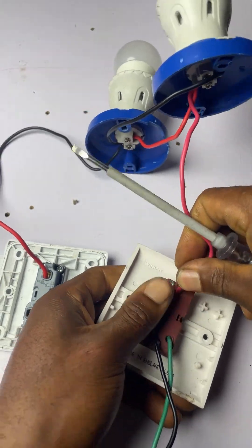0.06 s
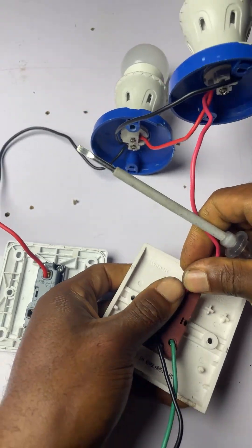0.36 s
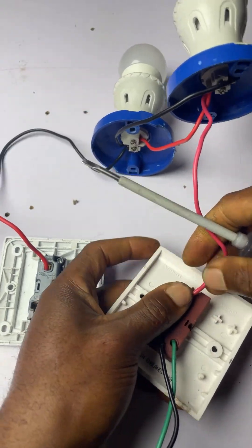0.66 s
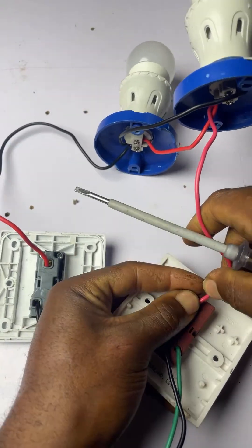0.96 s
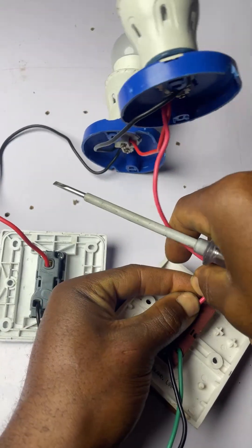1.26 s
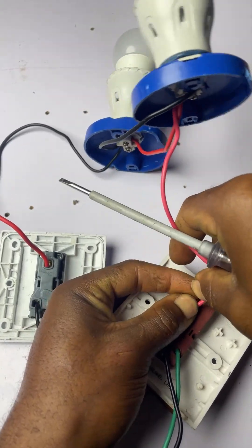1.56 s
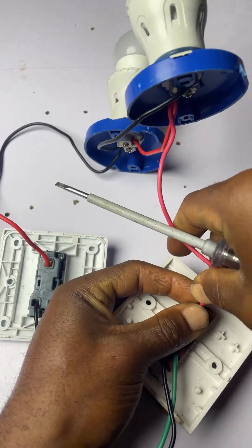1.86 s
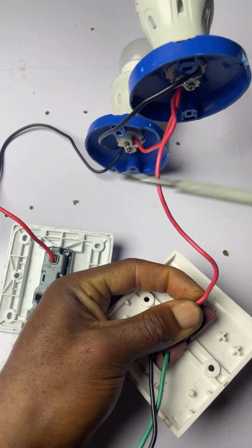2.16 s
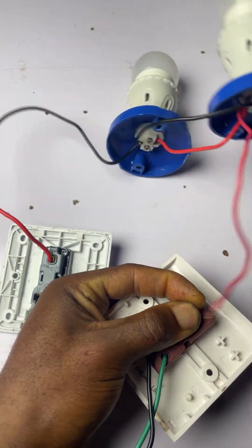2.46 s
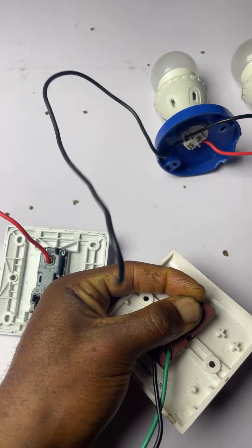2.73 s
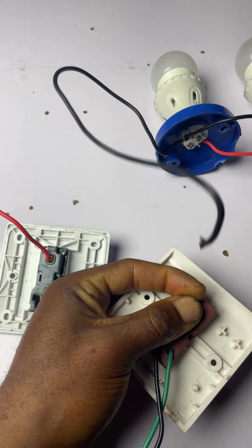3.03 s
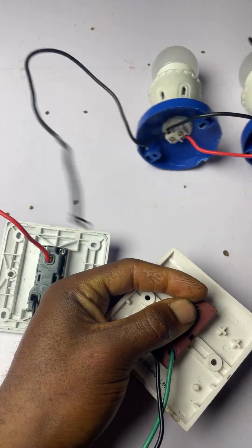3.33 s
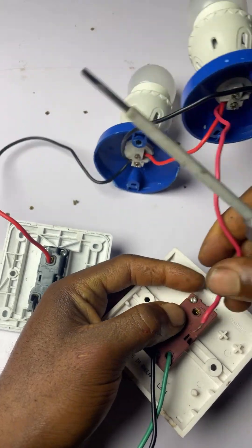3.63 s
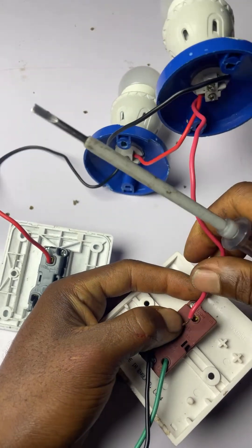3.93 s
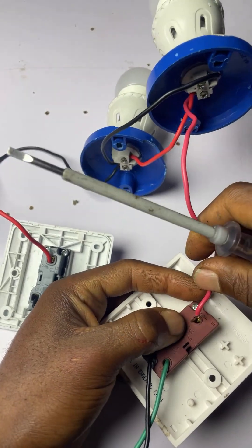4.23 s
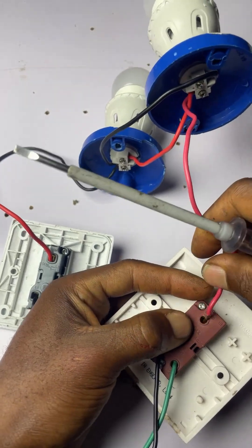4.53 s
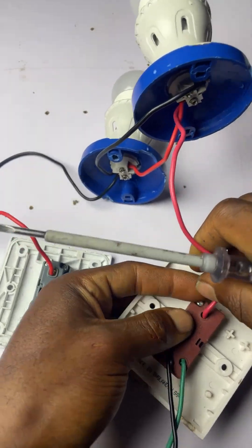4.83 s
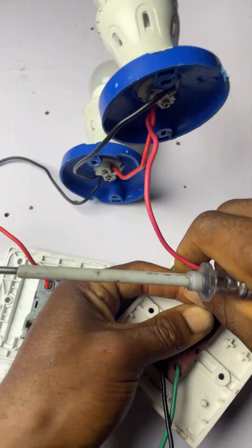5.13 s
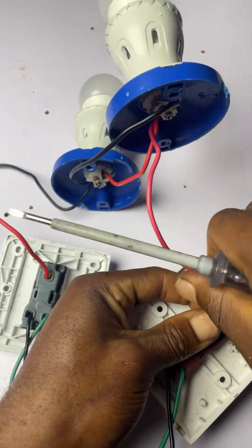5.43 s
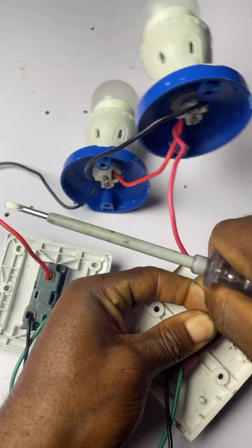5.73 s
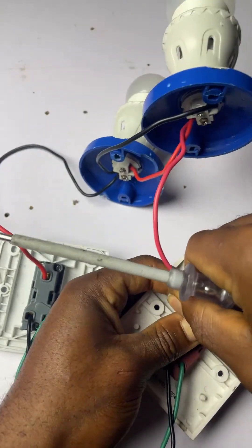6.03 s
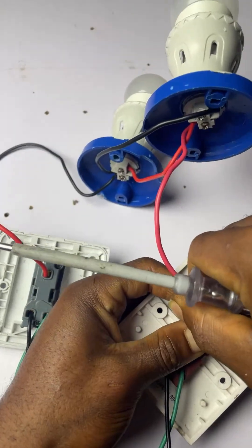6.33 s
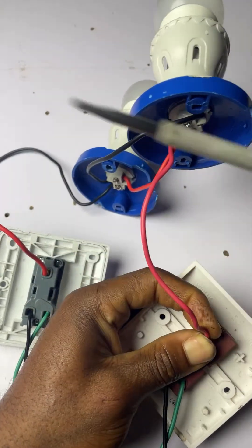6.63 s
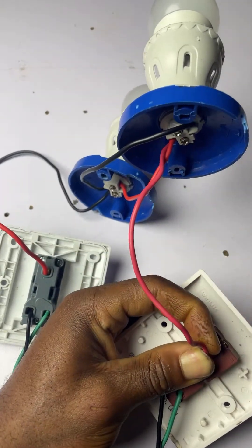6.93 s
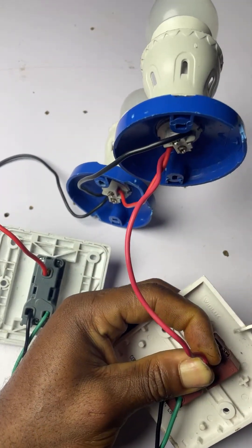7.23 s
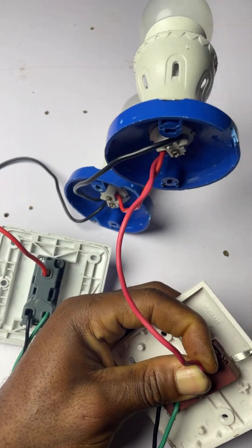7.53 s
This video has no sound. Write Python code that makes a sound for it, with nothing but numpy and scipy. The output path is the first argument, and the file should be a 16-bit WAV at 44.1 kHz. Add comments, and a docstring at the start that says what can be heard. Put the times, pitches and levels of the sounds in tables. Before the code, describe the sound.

Hands feed a wire into a plastic wall switch, making soft ticks, clacks and brief rubs. Tugged plastic lamp holders knock on a hollow board, and one topples with a loud clatter and a short ring. Scattered lighter knocks and ticks follow, then a firm double knock. Near the end a screwdriver tip clicks sharply on a metal screw several times. The sounds are close, in a small, quiet, bare room.

```python
"""A soft knock, a plastic clack and a rub come first: a wire is being fed into a wall switch on a hollow
work board in a small bare room. Tugged by their wires, two lamp holders knock on the board and excite its
bending modes; one topples and rings. Plastic shells clack, the wire ticks as it catches, and fingers rub.
At last a screwdriver tip clicks onto the terminal screw. Each impact is a brief contact followed by
damped modes and reverberation; the harder the contact, the brighter the sound."""
import sys
import numpy as np
from scipy import signal
from scipy.fft import rfft, irfft, next_fast_len
from scipy.io import wavfile
from scipy.ndimage import uniform_filter1d, map_coordinates

SR = 44100
rng = np.random.default_rng(int(sys.argv[2]) if len(sys.argv) > 2 else 0)


def wav_out(sig):
    """Save sig, one row per channel (or a flat mono array), as 16-bit PCM at SR to the path in sys.argv[1]."""
    wavfile.write(sys.argv[1], SR, np.round(np.clip(np.atleast_2d(sig).T, -1, 1) * 32767).astype(np.int16))


N = 343098
SIZE = 24576  # samples in one impact response
T, HZ = np.arange(SIZE) / SR, np.fft.rfftfreq(SIZE, 1 / SR)

# impacts of holder on board and of shell on shell: (time [s], level [dB], hardness [dB])
HOLDER_KNOCKS = [(.003, -41, 3.5), (.203, -43, -19), (0.646, -47.5, -20), (.694, -45.5, -8),
                 (1.997, -48.5, 5), (2.371, -44.5, 1), (2.484, -25.5, -4.5), (2.511, -31, 3),
                 (2.53, -28.5, 1), (2.568, -17, 11.5), (2.692, -27.5, 3.5), (3.285, -47, 4),
                 (3.346, -44, 4), (3.4419, -31, 6), (3.574, -38.5, 4), (3.66, -44, -15), (3.918, -44, -2),
                 (4.137, -39, -0.5), (4.298, -46, -12), (4.365, -44, -8), (4.408, -43.5, -8.5),
                 (4.521, -37, -3.5), (4.641, -35.5, -0.5), (4.767, -35, 5), (4.825, -41, 3),
                 (4.906, -34, -26), (5.256, -30, 4.5), (5.735, -24.5, -0.5), (5.761, -24, 0),
                 (5.784, -35.5, 10.5), (6.326, -52, 2), (6.477, -52.5, 6.5)]
SHELL_CLACKS = [(0.0228, -38, 1), (0.411, -49.5, -2.5), (1.1159, -51, -3.5), (2.446, -45, 3.5),
                (2.568, -18.5, -9.5), (2.654, -33.5, -11.5), (4.905, -60, 8), (5.951, -40, 4)]
# wire and nails on the switch, tip on the screw: (time [s], level [dB], hardness [dB], ring [Hz])
WIRE_TICKS = [(.0235, -37, 0, 2700), (.3895, -44.5, -4, 2740), (.6745, -56, -8, 2480),
              (.7, -54.5, 10, 2500), (1.1165, -43.5, -2, 2900), (1.5225, -66, 19.5, 5170),
              (1.648, -60, 2, 2580), (1.995, -48, -8.5, 2436), (2.109, -63.5, 3, 2150),
              (2.154, -58, -2.5, 3500), (2.182, -55, 2, 2280), (2.221, -63, 11.5, 1800),
              (2.35, -61, 3, 2480), (2.4355, -40, 3, 2400), (2.439, -33.5, 10, 3840),
              (3.223, -59.5, -6, 2590), (3.347, -62, 17, 2520), (3.5795, -27, -4.5, 2480),
              (3.6215, -47, -6, 2550), (3.6605, -52.5, -18, 2420), (3.9535, -56, -11, 2620),
              (3.978, -54.5, -10, 2680), (4.117, -61.5, 10, 4740), (4.407, -44, 0.5, 2550),
              (4.8245, -39.5, 6.5, 2590), (4.849, -44.5, 3, 2820), (4.906, -40, 2, 3050),
              (4.93, -46, 14, 2550), (4.95, -42, -15, 3630), (5.2055, -46.5, -11, 2480),
              (5.2372, -40, 8, 2900), (5.596, -64.5, -14, 2500), (6.3256, -51, -12, 2780),
              (6.4788, -51.5, -5, 2515), (6.422, -66.5, -14, 1890), (6.715, -70, -2, 2650),
              (6.881, -67, -17, 1900), (7.09, -71, -13, 1840)]
TIP_CLICKS = [(7.2262, -34.5, 19.5, 3710), (7.5053, -28.5, 19.5, 3284), (7.5165, -37.5, -1, 3284),
              (7.6206, -32, 5.5, 3200), (7.627, -35.5, -10.5, 3200), (7.69, -43, -5.5, 3100),
              (7.708, -45.5, -10, 3100)]
# finger strokes: (start [s], length [s], rumble level [dB], rub level [dB])
FINGER_STROKES = [(0, 0.06, -38.5, -46), (0.188, 0.1, -59, -73), (0.374, .15, -56.5, -63),
                  (0.591, 0.14, -57.5, -60), (0.796, 0.11, -60.5, -79), (1.07, .06, -76, -67.5),
                  (1.555, .11, -76, -69), (2.149, .13, -60, -77), (2.39, .15, -50.5, -61),
                  (3.25, 0.12, -54.5, -76), (3.485, 0.19, -48, -62.5), (4.822, .16, -42.5, -53),
                  (5.186, 0.054, -76, -63), (5.357, 0.066, -54, -80.5), (5.794, 0.24, -50.5, -59.5),
                  (6.373, .15, -58, -75)]
# rumble of the holding hand: (time [s], level [dB])
HOLD_LEVELS = [(0, -52.5), (1.05, -83), (1.7, -83), (2.099, -68), (5.5, -64), (6.7, -66.5), (7.78, -68.5)]

# low, middle and high band of large and of small impacts: (lower edge [Hz], upper edge [Hz])
LARGE_BANDS = [(80, 500), (800, 2200), (3500, 12000)]
SMALL_BANDS = [(600, 1600), (2000, 4500), (6000, 14000)]
# contact laws, a row per band: (offset from the impact's level [dB], slope with hardness [dB/dB])
KNOCK_LAW = [(0.5, 0), (-13, 1), (-44.5, 1.56)]
CLACK_LAW = [(-9, 0.96), (2.5, 0), (-9, 1)]
TICK_LAW = [(-6, 0.013), (-1.5, 0), (-20.5, 0.91)]
TIP_LAW = [(-3.5, -0.082), (-0.5, 0.049), (-19.5, 1)]

# normal modes of each body: (frequency [Hz], relative level [dB], t60 [s])
BOARD_MODES = [(124, -7, .2), (193, -2, .14), (228, -5, .12), (263, -5, .14), (329, 1, .21), (378, -5, .15),
               (466, 1, .11), (624, -2, .1), (700, -8, .09), (940, -7, .14), (1095, -10, .11),
               (1141, -7, .18), (1214, -9, .14), (1266, -8, .16), (1395, -8, .14), (1474, -11, .13),
               (1534, -13, .15), (1790, -13, .1), (1920, -11, .07), (2066, -12, .07), (2535, -22, .09),
               (3500, -31, .07), (6900, -33, .06), (8950, -23, .07), (9130, -24, .07)]
LAMP_MODES = [(478, -2.5, .2), (616, 2, 0.16), (937, -10, .43), (1141, -8, 0.44), (1265, -9, .49),
              (1330, -13.5, 0.71), (1390, -14, .6), (1450, -12.5, .63), (1500, -12, .7), (1710, -10.5, .68),
              (1770, -11.5, .65)]
SHELL_MODES = [(174, -9.5, 0.11), (337.2, -5.5, .16), (623.7, 1.5, .12), (941, -5.5, 0.16),
               (1384, -0.5, 0.1), (1520, -11, 0.032), (1885, -2.5, 0.11), (2650, -1.5, 0.071)]
DRIVER_MODES = [(940, -3, .013), (1110, -6, .016), (1873, -11, .016), (3200, -5, .012), (3750, 0, .018),
                (4500, -5, .01), (5600, 0, .014), (5920, -25, .16), (6950, -5, .009), (6850, -31, .25),
                (9300, -33, .18), (11000, -8, .007)]
SWITCH_MODES = [(970, -7.5, 0.016), (1890, -1.5, 0.025), (2480, -4, 0.035), (2900, -7.5, 0.028),
                (5450, -9, 0.014), (9000, -16, 0.014)]
# spectra of each body's dense, unresolved ringing: (frequency [Hz], relative level [dB])
BOARD_SPECTRUM = [(25, -45), (55, -25), (90, -6.5), (200, 7.5), (480, -0.5), (740, -5), (1050, -1.5),
                  (1400, -4.5), (2200, -12.5), (3300, -20.5), (5000, -33), (9300, -30.5), (12500, -40),
                  (16000, -53)]
SHELL_SPECTRUM = [(30, -39), (90, -2.5), (400, -3), (650, 1.5), (900, -2.5), (1800, 1), (2500, -0.5),
                  (3200, -4.5), (5300, -7.5), (8000, -15), (11000, -23.5), (16000, -36.5)]
DRIVER_SPECTRUM = [(60, -38), (500, -32.5), (850, 0), (1500, -3), (2600, -4.5), (3500, 5), (5700, 0.5),
                   (8000, -2.5), (11300, -4.5), (12500, -15), (16000, -21)]
SWITCH_SPECTRUM = [(60, -36.5), (400, -15), (900, -7), (2600, -2.5), (4500, -0.5), (8000, -5.5),
                   (11000, -12.5), (16000, -28.5)]
# noise of loose metal, shifting switch, skin and still room: (frequency [Hz], relative level [dB])
RATTLE_SPECTRUM = [(2500, -40), (5000, -15.5), (6900, -4.5), (7900, -10.5), (9200, 0.5), (10500, -13.5),
                   (13000, -24.5), (16000, -30)]
RUMBLE_SPECTRUM = [(30, -36.5), (60, -8), (90, -0.5), (135, 2), (220, -4), (340, -1.5), (500, -15),
                   (1100, -18.5), (2000, -38), (4000, -60.5)]
RUB_SPECTRUM = [(300, -25), (1000, -5), (2000, 6), (2700, 7.5), (4000, -8), (6500, -10.5), (9300, -17),
                (12000, -25), (16000, -31.5)]
AMBIENT_SPECTRUM = [(15, -58.5), (25, -28), (130, 2.5), (170, -6.5), (277, -10.5), (344, -21), (489, -23),
                    (962, -24.5), (1190, -33.5), (1400, -34), (2000, -34), (2690, -33.5), (5280, -39),
                    (8360, -37), (16000, -51)]
# reverberation time of the room: (frequency [Hz], t60 [s])
ROOM_T60 = [(80, 0.37), (300, .56), (800, 0.54), (1450, 0.53), (2800, .47), (6000, .38), (11000, 0.15),
            (16000, 0.17)]


def board_knocks(lag_s=.0025):
    """Dispersion: the struck board's bending waves are slower in the bass, lag_s late at 200 Hz."""
    count = len(HOLDER_KNOCKS)
    sounds = impacts(count, BOARD_MODES, BOARD_SPECTRUM, contact_t60=.0041,
                     dense_db=4, dense_t60=.1, modes_db=2, scatter_db=1.5)
    dispersion = np.exp(-4j * np.pi * lag_s * np.sqrt(200 * HZ))
    sounds = [irfft(rfft(sound) * dispersion) for sound in sounds]
    rooms = room_responses(count, tail_db=-10.5, delay_s=.005)
    return play(HOLDER_KNOCKS, KNOCK_LAW, sounds, rooms, LARGE_BANDS, span_s=.027)


def lamp_topple(start_s=2.568, level_db=-20.5, attack_s=.004, scatter_db=1):
    """Free vibration: the fallen lamp's hollow housing rings on in exponentially damped modes."""
    hz, db, t60 = np.transpose(LAMP_MODES)
    strengths = amp(level_db + db + scatter_db * rng.standard_normal(len(hz)))
    phases = rng.uniform(0, 2 * np.pi, len(hz))
    t = np.maximum(np.arange(N) / SR - start_s, 0)
    decays = np.exp(-np.log(1000) * t / t60[:, None])
    modes = np.sin(2 * np.pi * hz[:, None] * t + phases[:, None]) * decays
    return (strengths @ modes) * (1 - np.exp(-t / attack_s))


def shell_clacks(rebound_s=.017, rebound_db=-5):
    """Inelastic collision: hollow plastic shells meet, chatter and rebound once, more weakly."""
    rebounds = [(s + rebound_s, db + rebound_db, hardness) for s, db, hardness in SHELL_CLACKS]
    events = SHELL_CLACKS + rebounds
    sounds = impacts(len(events), SHELL_MODES, SHELL_SPECTRUM, contact_t60=.022,
                     dense_db=1.5, dense_t60=.12, modes_db=-5, scatter_db=2.5)
    rooms = room_responses(len(events), tail_db=-10, delay_s=.0041)
    return play(events, CLACK_LAW, sounds, rooms, LARGE_BANDS, span_s=.028)


def screwdriver_clicks(shaft_db=-11, shaft_t60=.059):
    """Resonance: the thin steel shaft rings at a pitch set by the grip, and radiates no bass."""
    events = np.array(TIP_CLICKS)
    sounds = impacts(len(events), DRIVER_MODES, DRIVER_SPECTRUM, contact_t60=.008,
                     dense_db=-16, dense_t60=.05, modes_db=1, scatter_db=3)
    shaft_rings = [amp(shaft_db) * ping(hz, shaft_t60) for hz in events[:, -1]]
    sounds = high_pass(np.add(sounds, shaft_rings), hz=674)
    rooms = room_responses(len(events), tail_db=-15, delay_s=.0014)
    return play(events[:, :-1], TIP_LAW, sounds, rooms, SMALL_BANDS, span_s=.0051)


def wire_ticks(ring_db=-1, ring_t60=.012, loss_per_db=.19):
    """Local resonance: each spot of the switch has its own short ring, purest when touched softly."""
    events = np.vstack([WIRE_TICKS, wire_slips()])
    sounds = impacts(len(events), SWITCH_MODES, SWITCH_SPECTRUM, contact_t60=.012,
                     dense_db=-10, dense_t60=.04, modes_db=-8, scatter_db=3)
    rings = [amp(ring_db - loss_per_db * hardness) * ping(hz, ring_t60) for _, _, hardness, hz in events]
    onset = np.clip(T / .0008, 0, 1)  # a brief fade-in softens each tick's attack
    sounds = np.add(sounds, rings) * onset
    rooms = room_responses(len(events), tail_db=-14, delay_s=.004)
    return play(events[:, :-1], TICK_LAW, sounds, rooms, SMALL_BANDS, span_s=.005)


def wire_slips(per_stroke=3, over_rub_db=-1.5, spread_db=3.5, hardness_db=4.5, ring_hz=2550):
    """Stick-slip: the wire catches at random in each stroke, louder under a firmer rub."""
    start, length, _, rub_db = np.repeat(FINGER_STROKES, per_stroke, axis=0).T
    when, size, spot = rng.uniform(-.91, 1, (len(start), 3)).T
    times = start + length * (1 + when) / 2
    levels_db = rub_db + over_rub_db + spread_db * size
    return np.column_stack([times, levels_db, np.full(len(start), hardness_db), ring_hz * (1 + spot / 10)])


def metal_rattle(full_db=-47.5, hard_knock_db=-22, growth=2.2, t60=.27, flutter_db=4):
    """Nonlinear rattle: a holder's loose parts zing, gaining growth dB per dB of knock up to a limit."""
    drive = np.zeros(N + SIZE)
    for s, db, _ in HOLDER_KNOCKS:
        level_db = full_db + growth * min(db - hard_knock_db, 0)
        drive[round(s * SR):][:SIZE] += amp(level_db) * fade(t60)
    fluttering = rng.standard_normal(N) * amp(flutter_db * wobble(280))
    return drive[:N] * coloured(fluttering, RATTLE_SPECTRUM)


def finger_friction(grip_db=5, shift_db=3, hold_rub_db=-18):
    """Friction noise: the switch rumbles as hands shift it, and skin rubs the wire with varying grip."""
    hold = amp(np.interp(np.arange(N) / SR, *np.transpose(HOLD_LEVELS)))
    start, length, rumble_db, rub_db = np.transpose(FINGER_STROKES)
    strokes = np.array([stroke(*timing) for timing in zip(start, length)])
    rub = coloured(skin_noise(depth_db=4.5) * amp(grip_db * wobble(60)), RUB_SPECTRUM)
    rumble = coloured(rng.standard_normal(N) * amp(shift_db * wobble(30)), RUMBLE_SPECTRUM)
    # holding and stroking add in power
    rumble_gain = np.hypot(hold, amp(rumble_db) @ strokes)
    rub_gain = np.hypot(amp(hold_rub_db) * hold, amp(rub_db) @ strokes)
    return rumble_gain * rumble + rub_gain * rub


def stroke(start, length, attack_s=.016, release_s=.03):
    """Exponential rise and decay: a stroke swells, holds and dies away."""
    t = np.maximum(np.arange(N) / SR - start, 0)
    return (1 - np.exp(-t / attack_s)) * np.exp(-np.clip(t - length, 0, 1) / release_s)


def skin_noise(depth_db):
    """Amplitude modulation: noise bands swell and sink separately as a finger's contact changes."""
    bands = signal.stft(rng.standard_normal(N), nperseg=512)[2]
    swell = uniform_filter1d(rng.standard_normal(bands.shape), size=7, axis=0)  # across frequency
    swell = uniform_filter1d(swell, size=5, axis=1)  # across time
    return signal.istft(bands * amp(depth_db * swell / swell.std()), nperseg=512)[1][:N]


def room_responses(count, tail_db, delay_s):
    """Reverberation: the direct sound, then a diffuse tail whose treble dies first; one per impact."""
    noise = rng.standard_normal((count, SIZE), dtype=np.float32)
    hz, t, bands = signal.stft(noise, SR, nperseg=256)
    decay = np.exp(-np.log(1000) * t / along(ROOM_T60, hz)[:, None]).astype(np.float32)
    tails = signal.istft(bands * decay, SR, nperseg=256)[1][:, :SIZE]
    arrival = np.clip(T / delay_s - 1, 0, 1)
    return [(T == 0) + amp(tail_db) * norm(tail * arrival) for tail in tails]


def room_tone(level_db=-68):
    """Stationary noise: the faint, low background of the room."""
    return amp(level_db) * coloured(rng.standard_normal(N), AMBIENT_SPECTRUM)


def impacts(count, modes, spectrum, contact_t60, dense_db, dense_t60, modes_db, scatter_db):
    """Modal superposition: a brief contact, dense ringing, and clear modes at new strengths each blow."""
    envelope = norm(fade(contact_t60)) + amp(dense_db) * norm(fade(dense_t60))
    bursts = rng.standard_normal((count, SIZE)) * envelope
    bursts = irfft(rfft(bursts) * minimum_phase(along(spectrum, HZ)))
    tones = np.array([amp(db) * np.sin(2 * np.pi * hz * T) * fade(t60) for hz, db, t60 in modes])
    strengths = amp(scatter_db * rng.standard_normal((count, len(modes))))
    signs = rng.choice([-1, 1], strengths.shape)
    rings = (strengths * signs) @ tones
    return [norm(burst) + amp(modes_db) * norm(ring) for burst, ring in zip(bursts, rings)]


def play(events, contact_law, sounds, rooms, bands, span_s):
    """Convolution puts each impact in the room; a harder contact is shorter and therefore brighter."""
    out = np.zeros(N + 2 * SIZE)
    offset_db, slope = np.transpose(contact_law)
    ending = np.clip((T[-1] - T) / .08, 0, 1) ** 2
    for (s, db, hardness_db), sound, room in zip(events, sounds, rooms):
        reverberant = irfft(rfft(sound) * rfft(room))
        levels_db = db + offset_db + slope * hardness_db
        out[round(s * SR):][:SIZE] += ending * equalised(reverberant, levels_db, bands, span_s)
    return out[:N]


def equalised(sound, levels_db, bands, span_s):
    """Equalisation: tilt an impact so that its first span_s approaches the three band levels."""
    window = np.clip((1.1 - T / span_s) * 5, 0, 1)
    power = np.abs(rfft(sound * window)) ** 2 * 2 / (SIZE * span_s * SR)
    own_db = [10 * np.log10(power[(HZ > low) & (HZ < high)].sum() + 1e-20) for low, high in bands]
    centres_hz = np.sqrt(np.prod(bands, axis=1))
    tilt = np.column_stack([centres_hz, np.subtract(levels_db, own_db)])
    return irfft(rfft(sound) * minimum_phase(along(tilt, HZ)))


def minimum_phase(gain_db):
    """Causality: a filter with this gain curve that lets nothing sound before the blow."""
    cepstrum = irfft(np.log(amp(gain_db)))
    cepstrum[1:SIZE // 2] *= 2
    cepstrum[SIZE // 2 + 1:] = 0
    return np.exp(rfft(cepstrum))


def coloured(noise, spectrum):
    """Spectral shaping of a long noise, returned at rms 1."""
    size = next_fast_len(N + 8192)
    gain = amp(along(spectrum, np.fft.rfftfreq(size, 1 / SR)))
    shaped = irfft(rfft(noise, size) * gain, size)[:N]
    return shaped / np.std(shaped)


def ping(hz, t60):
    """A damped oscillator of energy 1."""
    return norm(np.sin(2 * np.pi * hz * T) * fade(t60))


def fade(t60):
    """Exponential decay, 60 dB down after t60 seconds."""
    return np.exp(-np.log(1000) * T / t60)


def wobble(rate):
    """Random modulation: straight lines through rate random knots a second."""
    knots = rng.standard_normal(int(N * rate / SR) + 4)
    return map_coordinates(knots, [np.arange(N) * rate / SR], order=1)


def high_pass(x, hz):
    """Fifth-order roll-off below hz."""
    return signal.sosfilt(signal.butter(5, hz, "high", fs=SR, output="sos"), x)


def along(points, hz):
    """Interpolation of (frequency [Hz], value) points on a log axis."""
    frequencies, values = np.transpose(points)
    return np.interp(np.log(hz + 1), np.log(frequencies + 1), values)


def norm(x):
    """Normalisation to an energy of 1."""
    return x / (np.linalg.norm(x) + 1e-12)


def amp(db):
    """Decibels to amplitude ratio."""
    return 10 ** (np.asarray(db) / 20)


def scene():
    """Superposition: all the handling adds to the room tone in one channel."""
    background = room_tone()
    contacts = board_knocks() + metal_rattle() + shell_clacks() + wire_ticks() + screwdriver_clicks()
    return (contacts + finger_friction() + lamp_topple() + background)[None]


def record(dry, ceiling=.9, bass_hz=70.63, top_hz=16000):
    """Soft saturation rounds the loudest peaks; band limiting sheds the deep bass and highest treble."""
    rounded = dry / (1 + (dry / ceiling) ** 4) ** .25
    size = next_fast_len(N + 8192)
    passband = np.fft.rfftfreq(size, 1 / SR) < top_hz
    return irfft(rfft(high_pass(rounded, bass_hz), size) * passband, size)[..., :N]


dry = scene()
out = record(dry)
wav_out(out)
```